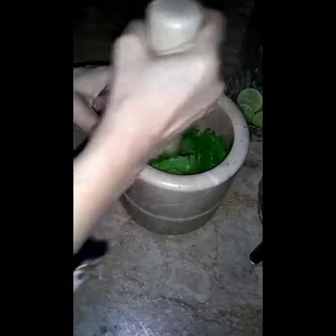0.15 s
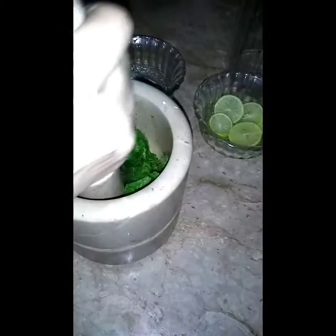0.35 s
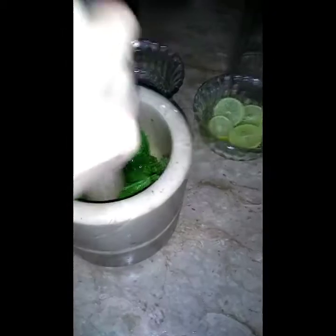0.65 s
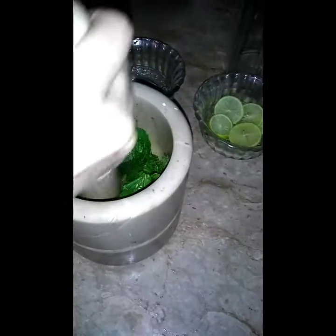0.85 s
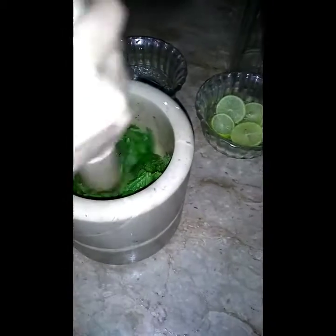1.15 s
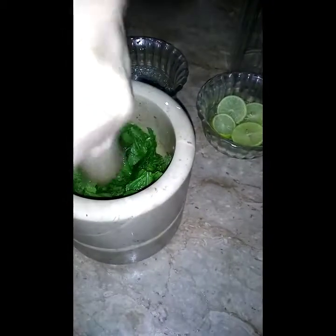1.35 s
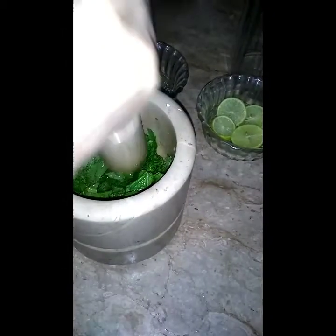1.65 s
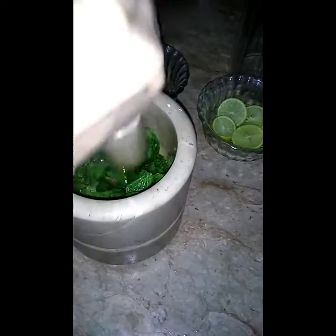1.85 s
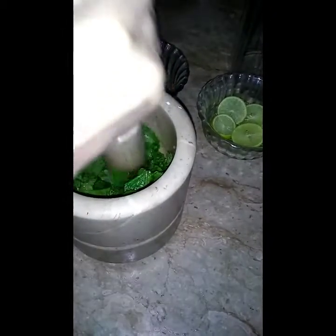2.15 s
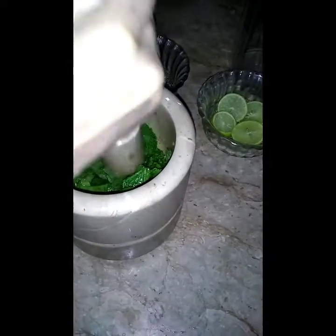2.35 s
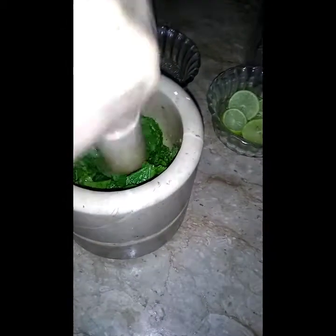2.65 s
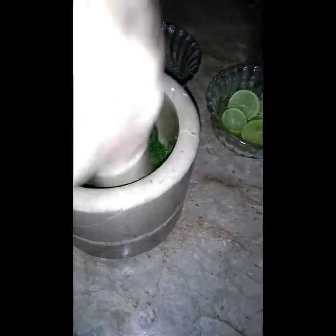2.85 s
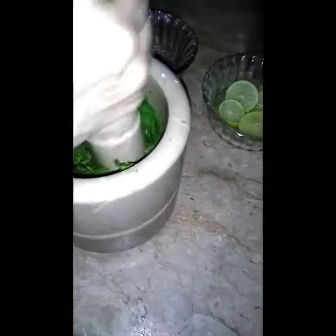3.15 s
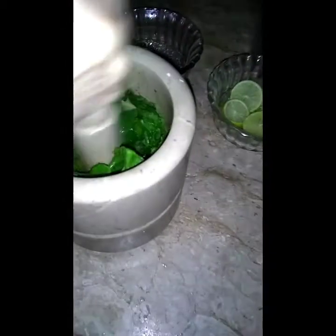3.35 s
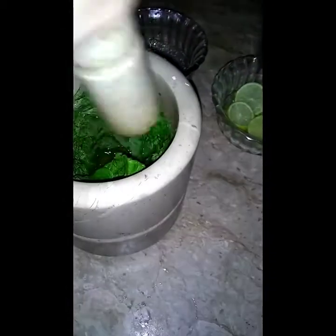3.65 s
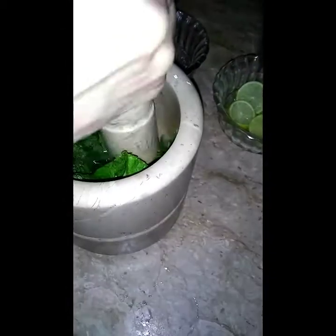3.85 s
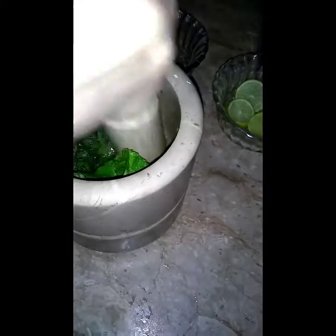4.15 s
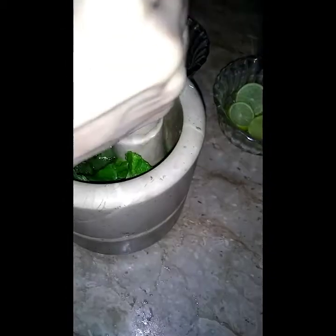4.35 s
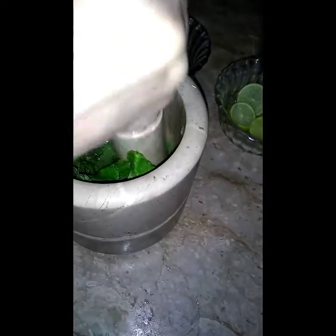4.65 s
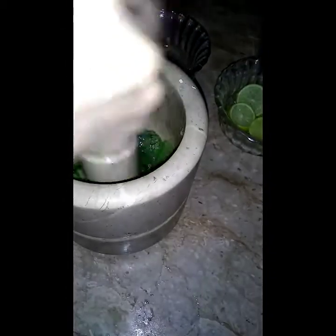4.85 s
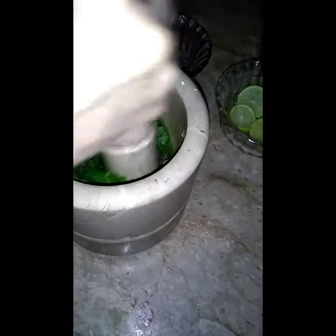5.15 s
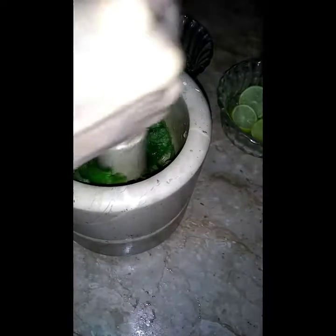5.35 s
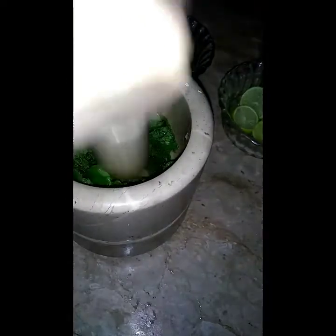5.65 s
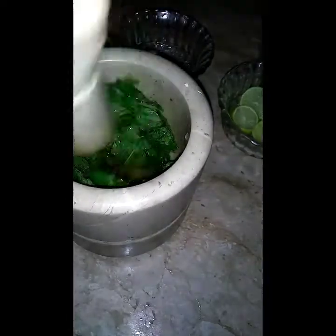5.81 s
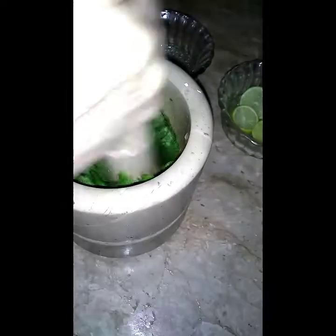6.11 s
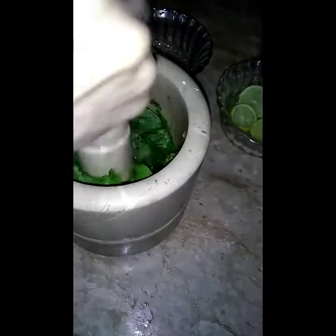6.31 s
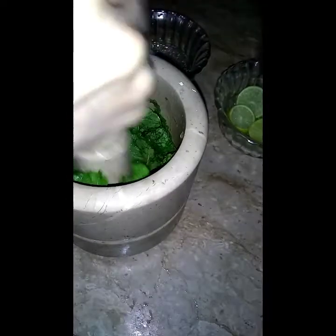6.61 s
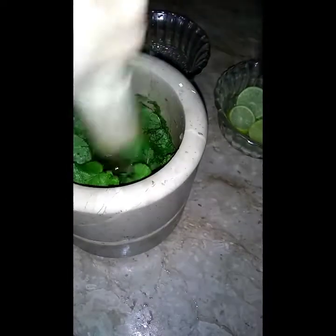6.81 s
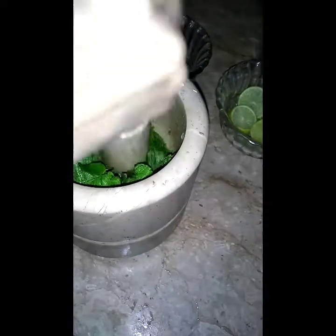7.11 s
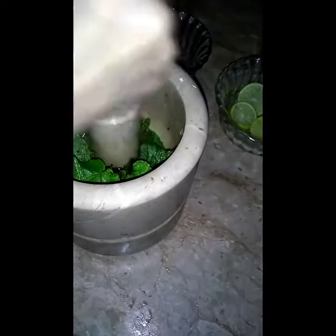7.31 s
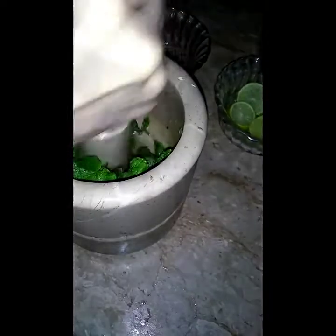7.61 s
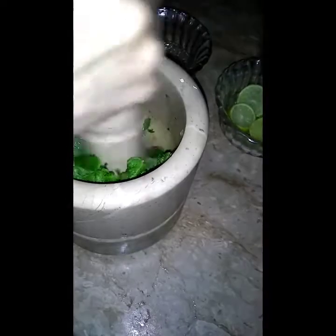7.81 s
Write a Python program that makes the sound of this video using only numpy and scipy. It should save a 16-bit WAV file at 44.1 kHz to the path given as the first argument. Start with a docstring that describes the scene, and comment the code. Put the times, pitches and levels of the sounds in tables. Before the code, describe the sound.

A fan rushes and hums steadily in a kitchen while wet leaves are pounded in a stone mortar, heard up close. The pestle starts with an even run of short, moist crunches, then turns irregular, mixing dull knocks with rustles and small squelches. Past the middle it strikes bare stone with a bright, briefly ringing clack, followed by short grinding rubs and more thuds. The walls add a slight echo.

```python
"""On a kitchen counter, close to a phone, a stone pestle crushes wet mint leaves in a marble mortar.
Cushioned strokes rustle, crunch and squelch as cells burst and juice pops; harder ones thud through
the counter, grind, or clack stone on stone. Hard walls answer and a fan runs steadily behind.
The phone's gain control ducks everything after loud strokes, and the sound cuts out once, briefly."""
import sys
import numpy as np
from scipy import signal
from scipy.fft import rfft, irfft, next_fast_len
from scipy.io import wavfile
from scipy.ndimage import uniform_filter1d, minimum_filter1d, map_coordinates

SR = 44100
rng = np.random.default_rng(int(sys.argv[2]) if len(sys.argv) > 2 else 0)


def generate_wav(sig):
    """Save sig (samples, or channels by samples) to the path in sys.argv[1] as 16-bit PCM at SR."""
    pcm = np.round(np.clip(np.atleast_2d(sig).T, -1, 1) * 32767).astype(np.int16)
    wavfile.write(sys.argv[1], SR, pcm)


N = 351477

# strokes into the leaves: t/s, crunch/dB, rise/s, length/s, first bite/dB,
# bowl's hollow f/Hz, hollow/dB, squelch f/Hz, squelch/dB, rustle/dB
STROKES = [(0.117, -41, 0.0031, 0.016, -10.5, 840, -23, 3440, -10, -50.5),
           (0.281, -34.5, 0.0049, 0.014, 9, 900, 3, 3460, 9, -52),
           (0.545, -29.5, 0.0055, 0.019, 1, 955, 15, 2420, -10, -53),
           (0.816, -26.5, 0.0048, 0.016, 4.5, 980, 12.5, 3570, 5, -51),
           (1.118, -30, 0.002, 0.014, -13, 864, 18.5, 2470, -67, -40),
           (1.382, -26.5, 0.0032, 0.021, -36, 996, 10.5, 2140, 13, -47.5),
           (1.703, -31, 0.0035, 0.021, 6.5, 883, 18, 1910, -53, -43.5),
           (1.9702, -28, .001, 0.021, 11.5, 935, 16.5, 3400, -24, -46.5),
           (2.231, -26.5, 0.0068, 0.012, 9, 924, 15, 3600, -1, -50),
           (2.484, -27, 0.0027, 0.02, 7, 1027, 11.5, 5660, 11, -64),
           (2.832, -35.5, 0.0051, 0.0099, 2.5, 930, 21.5, 3080, 5, -39),
           (3.733, -25, 0.0036, 0.018, -16, 920, 10.5, 3500, -4, -41),
           (3.999, -28, 0.0013, 0.015, -9, 830, 14.5, 3270, 5, -45.5),
           (4.042, -35, 0.00071, 0.0033, -39, 890, -29, 8400, 17, -48.5),
           (4.229, -21.5, 0.0035, 0.015, -7, 950, 1, 3960, 5, -51),
           (4.495, -26.5, 0.0014, 0.027, -19, 920, -12, 4000, -9, -65),
           (5.83, -43, 0.0035, 0.098, 0, 926, 28.5, 3800, -8, -52),
           (7, -27, 0.0042, 0.014, -3, 970, 14.5, 3350, 0, -43.5)]
# tone of snapping leaves: f/Hz, level/dB
LEAF_TONE = [(300, -27), (750, -12.5), (1400, -7.5), (2000, 2.5), (2700, 0.5), (3400, 4.5), (4500, 0),
             (6500, -3), (10000, -4), (14500, -13)]
# tone of the mortar knocking on the counter: f/Hz, level/dB
KNOCK_TONE = [(40, -35), (120, -3), (250, 14), (500, 15), (1000, 11), (1700, 9), (2400, 11), (3500, -0.5),
              (5000, 4.5), (6200, -3), (14000, 0)]
SPLIT = np.array([[.5], [-.5]])  # shares a difference between left and right


def crushes(lead_s=0.022, bite_s=0.0013, hollow_boost_db=15, trim_db=-1):
    """Leaf cells burst under the pestle; the crackle rings the wet pulp and the bowl's hollow."""
    out, t = np.zeros((2, N)), clock(SR // 4) - lead_s
    for s, db, rise, length, bite_db, hollow_hz, hollow_db, squelch_hz, squelch_db, _ in STROKES:
        force = np.exp(np.minimum(t, 0) / rise) * fade(np.maximum(t - .36 * length, 0), 5.2 * length)
        bite = amp(bite_db) * np.exp(-(t / bite_s - 1) ** 2)  # the first cells give way together
        snaps = grit(len(t), spiky_db=3.6)
        crunch = coloured(snaps * np.hypot(force, bite), LEAF_TONE) / np.std(coloured(snaps, LEAF_TONE))
        treble_db = 0.31 * (db + 13)  # softer strokes are duller
        crunch = filtered(crunch, lambda hz: amp(treble_db * hz ** 2 / (hz ** 2 + 9000 ** 2)))
        squelch = amp(squelch_db) * cavity(crunch, squelch_hz, width_hz=210) + bubbles(force, count=16)
        hollow = amp(hollow_db + hollow_boost_db) * cavity(crunch, hollow_hz, width_hz=58.4)
        add(out, s - lead_s, amp(db + trim_db) * (crunch + squelch + hollow))
    return out


def rustle(early_s=0.0067, snaps_per_s=320):
    """Wet leaves rustle and fizz around each stroke and as the pestle slides over them; stalks snap."""
    # slides between strokes: t/s, level/dB, half length/s
    slides = [(0.016, -53, 0.092), (1.204, -49.5, 0.054), (2.784, -43, .035), (2.931, -44.5, 0.06),
              (3.086, -42, 0.035), (3.207, -49, 0.052), (4.755, -42, 0.071), (4.928, -47, 0.045),
              (6.078, -45.5, 0.034), (6.758, -47.5, 0.027), (6.94, -46, 0.045), (7.698, -59, 0.49)]
    t = clock(N)
    swell = lambda s, half: np.exp(-np.minimum(np.abs(t - s) / half, 10) ** 2)
    power = amp(-63 + 2 * wobble(21)) ** 2  # the leaves are never quite at rest
    for s, *_, db in STROKES:
        brush = np.where(t < s, swell(s - early_s, half=0.052), fade(np.abs(t - s), t60=0.54))
        power += (amp(db) * brush) ** 2
    for s, db, half in slides:
        power += (amp(db) * swell(s, half)) ** 2
    force = np.sqrt(power) * amp(1.6 * wobble(50))
    stalks = (rng.random(N) < snaps_per_s / SR) * rng.normal(0, 6, (2, N))
    crackle = force * unit(coloured(grit(N, spiky_db=-6) + stalks, LEAF_TONE))
    return .85 * (crackle + bubbles(force, count=750))


def bubbles(force, count, low_hz=2800, high_hz=11000, t60_cycles=75):
    """Tiny bubbles in the juice ping at chance pitches, most of them while the squeeze is hardest."""
    moment, pitch, size, phase = rng.random((count, 4)).T[..., None]
    start = np.searchsorted(np.cumsum(force ** 2) / np.sum(force ** 2), moment)
    age, hz = clock(SR // 40), low_hz * (high_hz / low_hz) ** pitch
    envelope = amp(14 * (size - .5)) * force[start] * fade(age, t60_cycles / hz)
    at = (start + np.arange(len(age))).ravel()
    pings = [envelope * np.sin(2 * np.pi * (hz * age + channel * phase)) for channel in range(2)]
    return np.array([np.bincount(at, ping.ravel(), len(force))[:len(force)] for ping in pings])


def pops(boost_db=4):
    """Pockets of juice burst and the splash rings them: a tick when short, a squelch when long."""
    # bursting pockets: t/s, level/dB, f/Hz, t60/s
    pockets = [(1.75, -45, 3310, 0.072), (2.0158, -34, 3520, 0.034), (3.14, -27.5, 3220, 0.022),
               (3.193, -41, 4750, 0.05), (3.521, -46, 6200, 0.018), (4.2265, -36, 3400, 0.0092),
               (4.783, -33, 3650, .025), (4.7975, -34, 3340, 0.047), (5.175, -43, 5800, 0.0082),
               (5.339, -46, 4700, 0.013), (6.168, -31, 3450, 0.013), (6.313, -42, 3500, 0.043),
               (6.486, -33, 3350, 0.017), (6.737, -39, 3540, .07), (7.392, -46, 3300, 0.19),
               (7.6858, -45, 3600, 0.057)]
    out, t = np.zeros((2, N)), clock(SR // 12)
    for s, db, hz, t60 in pockets:
        splash = unit(coloured(grit(len(t), spiky_db=0.5), LEAF_TONE))
        pocket = unit(cavity(cavity(splash, hz, width_hz=1800), hz, width_hz=1800))
        add(out, s, amp(db + boost_db) * fade(t, t60) * (.7 * pocket + .12 * splash))
    return out


def cavity(x, centre_hz, width_hz):
    """A hollow resonates, passing one band of whatever excites it."""
    return filtered(x, lambda hz: 1j * hz * width_hz / (centre_hz ** 2 - hz ** 2 + 1j * hz * width_hz))


def bowl_echoes(x, skew=0.067):
    """Echoes inside the bowl comb the crackle, a little differently left and right."""
    # bounces between the bowl's walls: path/m, level/dB
    bounces = [(0.622, -29), (1.051, -7.5)]
    stretch = 1 + skew * SPLIT
    echo = lambda hz, path: np.exp(-2j * np.pi * hz * stretch * path / 343)
    return filtered(x, lambda hz: 1 + sum(amp(db) * echo(hz, path) for path, db in bounces))


def thuds():
    """Each blow pushes the mortar on the counter; the more leaves cushion it, the duller the thud."""
    # blows that reach through the leaves: t/s, level/dB, contact/ms
    blows = [(2.498, -24, 4.4), (3.085, -17, 0.7), (3.144, -15, 0.56), (3.315, -16, 0.92),
             (3.3294, -9.5, 0.4), (3.685, -13, 0.31), (4.240, -16, 2), (4.514, -19.5, 3.7),
             (5.321, -23.5, 1.24), (5.329, -26.5, 0.93), (5.8326, -12.5, 0.14), (5.867, -15, 0.22),
             (6.114, -20.5, 2.7), (6.422, -19, 1.84), (6.573, -32, 0.79), (6.629, -24.5, 0.96),
             (7.911, -15, 0.63)]
    # modes of the mortar on the counter: f/Hz, level/dB, t60/s
    body_modes = [(256.3, 5.5, 0.17), (276.6, 10.5, 0.098), (359.3, 4, 0.27), (543, 0, 0.25),
                  (623.4, -0.5, 0.31), (819, 5.5, 0.078), (875, -8, 0.35), (971, 9.5, 0.083),
                  (1140, -10, 0.23), (1325, -8, 0.21), (1540, -11, 0.37), (1820, -9, 0.32),
                  (3245, 9, 0.034), (4070, 10.5, 0.042)]
    out, t = np.zeros((2, N)), clock(SR // 2)
    for s, db, contact_ms in blows:
        echoes = rng.standard_normal((2, len(t)))  # dense scatter from counter and wall
        lows = filtered(echoes, lambda hz: 1 / (1 + (hz / 2200) ** 4))
        push = amp(-19) * (lows * fade(t, t60=0.096) + (echoes - lows) * fade(t, t60=0.16))
        push[:, 0] += 1  # the direct hit
        body = amp(-35) * ring(body_modes, t, spread_rad=0.99)
        knock = cushioned(coloured(push, KNOCK_TONE) + body, contact_ms)
        add(out, s, amp(db) * unit_over(knock, seconds=0.01))
    return out


def cushioned(x, contact_ms, damping=0.95, low_hz=70):
    """The pestle's mass on springy pulp: one contact is half a swing, and faster motion is lost."""
    swing_hz = 1000 / (2 * contact_ms)
    radiated = lambda hz: 1j * hz / (low_hz + 1j * hz)  # a small mortar gives off little bass
    spring = lambda hz: 1 / (1 - (hz / swing_hz) ** 2 + 1j * damping * hz / swing_hz)
    return filtered(x, lambda hz: radiated(hz) * spring(hz))


def clinks():
    """Where no leaf lies between them, pestle and bowl crack together and ring briefly."""
    # stone on stone: t/s, pestle ring/dB, bowl ring/dB, crack/dB, attack/s
    hits = [(3.330, -40, -27.5, -28, .004), (3.683, -24, -64, -26, .0006), (5.8325, -7, -44, -8, .0001),
            (5.867, -27, -60, -25, .0003)]
    # modes of the two stones: f/Hz, level/dB, t60/s
    pestle_modes = [(4790, 3, .055), (4786, -18.5, .34), (4815, -24, .16), (4960, -6, .035),
                    (10060, -27, .38), (10020, -31, .2), (10200, -30, .14)]
    bowl_modes = [(5130, -14, .06), (5652, -15, .07), (6804, -16, .07), (7305, -17, .08), (7849, -13, .085),
                  (8240, -7, .08), (8340, -8, .14), (9329, -9, .17), (9733, -15, .06), (11120, -19, .14),
                  (12180, -3, .11), (12330, -8, .09), (12640, -13, .11)]
    # tone of the contact itself: f/Hz, level/dB
    crack_tone = [(1200, -15), (2000, -1), (3400, 4), (4900, -3), (6000, -17), (12000, -15),
                  (14500, -24)]
    out, t = np.zeros((2, N)), clock(SR // 2)
    for s, pestle_db, bowl_db, crack_db, attack in hits:
        noise = unit(coloured(rng.standard_normal((2, len(t))), crack_tone))
        crack = amp(crack_db) * fade(t, t60=.024) * noise
        pestle = amp(pestle_db) * ring(pestle_modes, t, spread_rad=-2)
        bowl = amp(bowl_db) * ring(bowl_modes, t, spread_rad=1.5)
        add(out, s, (1 - np.exp(-t / attack)) * (crack + pestle + bowl))
    return out


def grinding(bleed=0.21):
    """A quick run of slips under the pestle makes the mortar grumble."""
    # rubs round the bottom: t/s, level/dB, length/s, contact of each slip/ms
    rubs = [(5.308, -30.5, 0.028, 1.64), (6.418, -24.5, 0.02, 0.89), (6.441, -27, 0.021, 0.91),
            (6.565, -33, 0.053, 0.81), (6.606, -27, 0.031, 1.07), (7.799, -42.5, 0.023, 1.3),
            (7.949, -20.5, 0.038, 0.79)]
    out, t = np.zeros((2, N)), clock(SR // 4)
    for s, db, length, contact_ms in rubs:
        slips = grit(len(t), spiky_db=2.2)
        slips = slips + bleed * slips[::-1]  # left and right partly alike
        pressure = np.sin(np.pi * np.minimum(t / length, 1))
        grumble = cushioned(coloured(slips * pressure, KNOCK_TONE), contact_ms, damping=0.23)
        add(out, s, amp(db) * unit_over(grumble, length))
    return out


def kitchen(x):
    """Hard walls answer with a diffuse tail, each band dying at its own rate."""
    # room decay: f/Hz, t60/s
    decay = [(150, 0.71), (500, 0.45), (2000, 0.61), (6000, 0.45), (14000, 0.88)]
    hz, t, bands = signal.stft(rng.standard_normal((2, SR // 2)), SR, nperseg=256)
    tail = signal.istft(bands * fade(t, along(decay, hz)[:, None]), SR, nperseg=256)[1]
    return signal.fftconvolve(x, tail / np.linalg.norm(tail[0]), axes=1)[:, :N]


def fan(sway_db=0.7, hum_trim_db=-5, drift_rad=0.69):
    """Rushing air, barely wavering, over a slightly unsteady motor hum."""
    # tone of the rush, tone of the hiss, and the motor's partials: f/Hz, level/dB
    rush_tone = [(25, -36), (50, -11.5), (70, -12.5), (95, 0.5), (135, -11), (190, 0), (250, 0.5),
                 (310, -8.5), (365, -3), (450, -8), (900, -8.5), (1300, -19), (2000, -23.5), (3300, -25.5)]
    hiss_tone = [(1500, -2.5), (3200, -7), (4500, -13), (7000, -15.5), (10000, -18.5), (14500, -27.5)]
    partials = [(91.5, -50.5), (247.6, -45.5), (355.3, -51.5)]
    noise = lambda response: unit(filtered(rng.standard_normal((2, N)), response))
    rush = noise(lambda hz: amp(along(rush_tone, hz)) / (1 + (hz / 3400) ** 4))
    hiss = noise(lambda hz: amp(along(hiss_tone, hz)))
    motor = lambda hz: np.sqrt(2) * np.sin(2 * np.pi * hz * clock(N) + drift_rad * wobble(7))
    hum = sum(amp(db + hum_trim_db) * motor(hz) for hz, db in partials)
    return amp(-36.5) * (amp(sway_db * wobble(15)) * rush + amp(-12.5) * hiss) + hum


def ring(modes, t, spread_rad):
    """Damped modes at fresh strengths, reaching left and right in different phases."""
    phase = spread_rad * SPLIT
    return sum(amp(db + rng.standard_normal()) * fade(t, t60) * np.sin(2 * np.pi * hz * t + phase)
               for hz, db, t60 in modes)


def grit(size, spiky_db):
    """Dense tiny snaps of uneven size, different left and right."""
    sizes = np.repeat(amp(spiky_db * rng.standard_normal(size // 32 + 1)), 32)[:size]
    return unit(rng.standard_normal((2, size)) * sizes)


def wobble(rate):
    """A smooth random curve, rate knots a second."""
    return map_coordinates(rng.standard_normal(N // 100), [clock(N) * rate], mode="mirror")


def filtered(x, response):
    """x times a complex response of frequency."""
    size = x.shape[-1]
    padded = next_fast_len(size + SR // 4)
    return irfft(rfft(x, padded) * response(np.fft.rfftfreq(padded, 1 / SR)), padded)[..., :size]


def coloured(x, tone, size=2048):
    """x through the minimum-phase filter with this tone, which keeps attacks sharp."""
    cepstrum = irfft(np.log(amp(along(tone, np.fft.rfftfreq(size, 1 / SR)))))
    cepstrum[1:size // 2] *= 2
    cepstrum[size // 2 + 1:] = 0
    impulse = irfft(np.exp(rfft(cepstrum)))
    return signal.fftconvolve(x, impulse[None], axes=1)[:, :x.shape[1]]


def along(points, hz):
    """A curve through (f/Hz, value) points on a log axis."""
    freqs, values = np.transpose(points)
    return np.interp(np.log(hz + 1), np.log(freqs), values)


def add(track, s, sound):
    """Mix a sound in from time s."""
    part = track[:, max(round(s * SR), 0):][:, :sound.shape[1]]
    part += sound[:, :part.shape[1]]


def unit_over(x, seconds):
    """Stereo x with the energy of a unit-RMS sound this long."""
    return x / np.sqrt(np.sum(x ** 2) / (2 * SR * seconds))


def unit(x):
    return x / np.sqrt(np.mean(x ** 2) + 1e-20)


def amp(db):
    return 10 ** (np.asarray(db) / 20)


def fade(t, t60):
    return np.exp(-np.log(1000) * t / t60)


def clock(size):
    return np.arange(size) / SR


def stereo_image(x, null_hz=2275):
    """The phone's delayed crossfeed puts its two ports in and out of step in alternate bands."""
    # what each port loses of the other: f/Hz, share
    crossfeed = [(450, 0.018), (750, 0.94), (1100, 0.5), (1700, 1), (2270, 1), (3400, 0.72), (4550, 0.36),
                 (5700, 0.07), (7000, 0.11), (12000, 0.014)]
    # width: f/Hz, side over mid/dB
    width = [(60, 18), (200, -6), (450, -1.5), (750, -10), (1120, -7), (1600, 1), (14000, -0.5)]
    # balance: f/Hz, left over right/dB
    lean = [(200, 1), (3000, 0), (5000, -3.5), (9000, -2.5), (14000, -6.5)]
    # phase between the ports: f/Hz, left's lead/rad
    lead = [(100, 0.63), (300, 0.19), (450, 0.022), (600, 0.66), (1000, 0.012)]

    def mid_side_gains(hz):
        echo = np.clip(along(crossfeed, hz), 0, .99) * np.exp(-2j * np.pi * hz / null_hz)
        angle = np.arctan(amp(along(width, hz)) * np.abs((1 + echo) / (1 - echo)))
        return np.array([np.cos(angle), np.sin(angle)])

    mid, side = filtered(np.array([x[0] + x[1], x[0] - x[1]]) / np.sqrt(2), mid_side_gains)
    pan = lambda hz: (amp(along(lean, hz)) * np.exp(1j * along(lead, hz))) ** SPLIT
    return filtered(np.array([mid + side, mid - side]), pan)


def gain_control(x, threshold_db=-28, share=0.3, attack_s=0.091, hold_s=0.47, release_db_per_s=18):
    """Loud moments, bright ones most, pull the gain down; it holds, then climbs back."""
    sidechain = x ** 2 + (1.5 * np.diff(x, prepend=0)) ** 2
    power = np.abs(uniform_filter1d(sidechain.mean(0), size=220))
    wanted_db = share * np.maximum(10 * np.log10(power + 1e-12) - threshold_db, 0)
    window = 2 * int(hold_s * SR / 2) + 1
    held_db = -minimum_filter1d(-wanted_db, window, origin=window // 2)
    climb_db, step = release_db_per_s * clock(N), 1 / (attack_s * SR)
    released_db = np.maximum.accumulate(held_db + climb_db) - climb_db
    cut_db = signal.lfilter([step], [1, step - 1], released_db)
    return np.clip(x * amp(-cut_db), -1, 1)


def scene():
    """Leaves and stone up close, the kitchen's answer and the fan behind."""
    leaves = amp(-0.5) * bowl_echoes(crushes() + rustle()) + pops()
    stone = thuds() + clinks() + grinding()
    # the bowl throws its treble upwards, so little of it reaches the walls
    spill = filtered(amp(-13) * leaves + amp(-7.5) * stone, lambda hz: 1 / (1 + (hz / 2600) ** 2))
    return leaves + stone + kitchen(spill) + fan()


def record(dry):
    """The phone shapes the stereo, rides its gain, cuts out once and loses the very top."""
    t = clock(N)
    gap = (t > 0.220) & (t < 0.286)
    dropout = amp(-48 * uniform_filter1d(gap * 1., size=128))
    ducked = gain_control(stereo_image(dry))
    return filtered(ducked * dropout, lambda hz: 1 / (1 + (hz / 14450) ** 100))


dry = scene()
out = record(dry)
generate_wav(out)
```